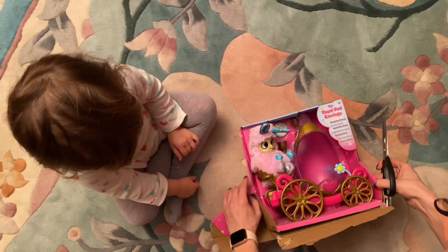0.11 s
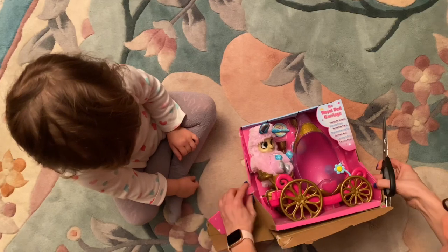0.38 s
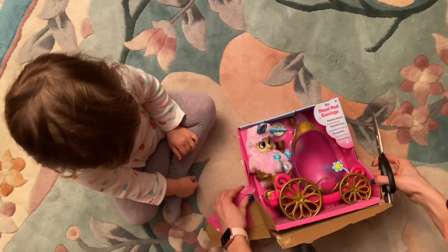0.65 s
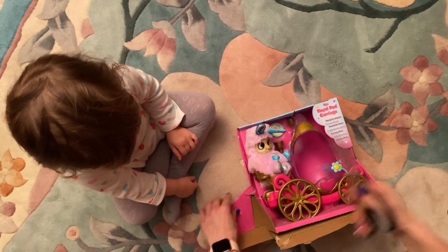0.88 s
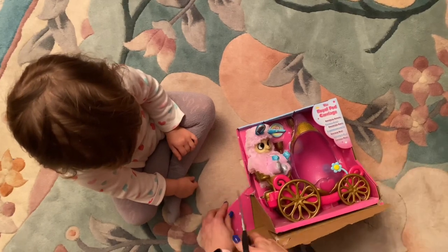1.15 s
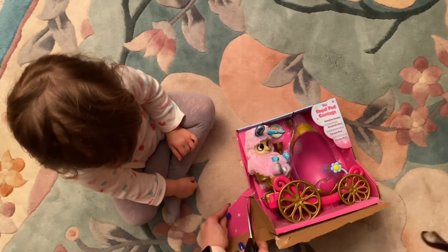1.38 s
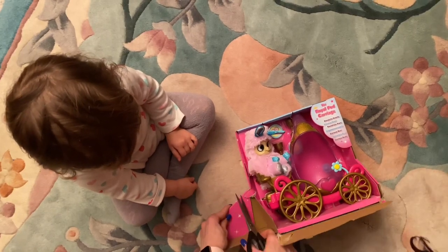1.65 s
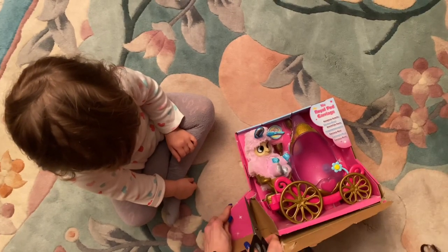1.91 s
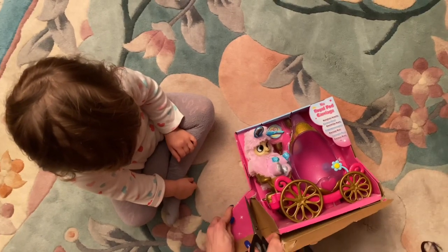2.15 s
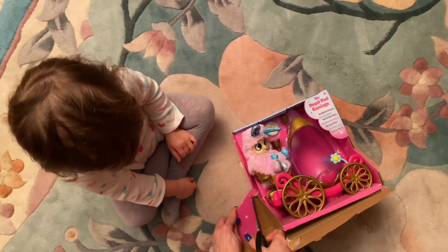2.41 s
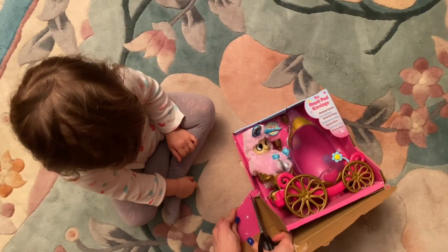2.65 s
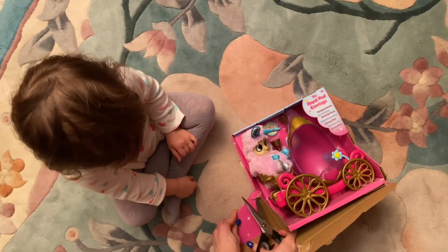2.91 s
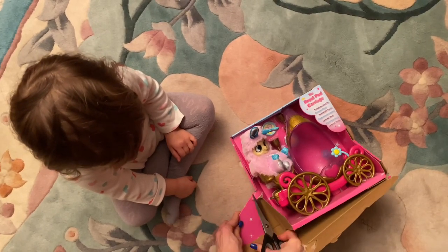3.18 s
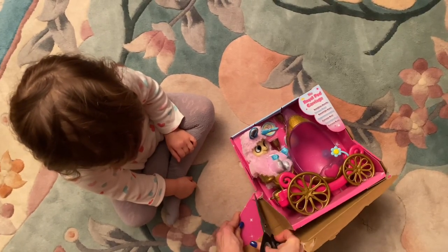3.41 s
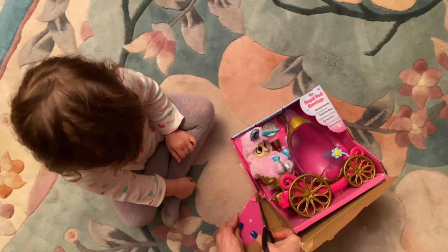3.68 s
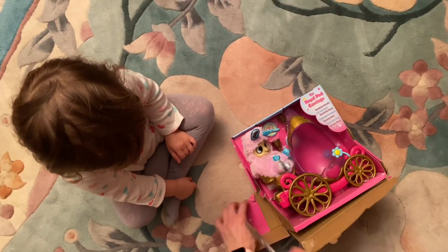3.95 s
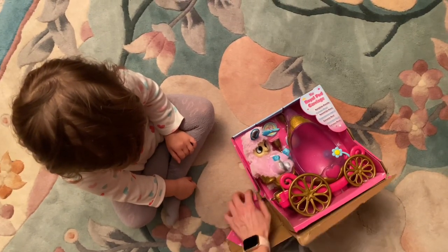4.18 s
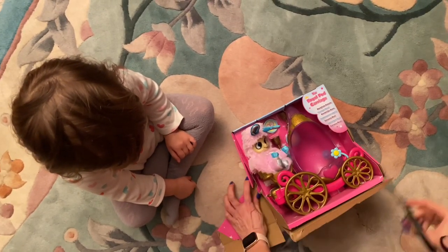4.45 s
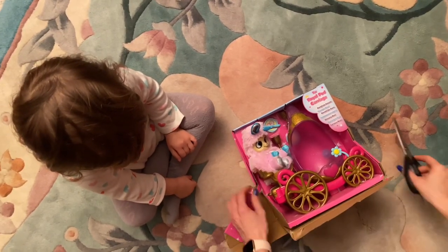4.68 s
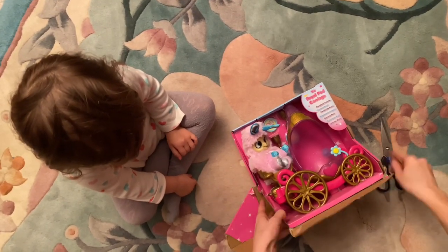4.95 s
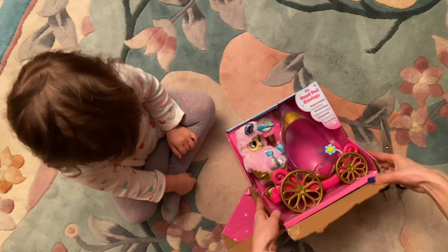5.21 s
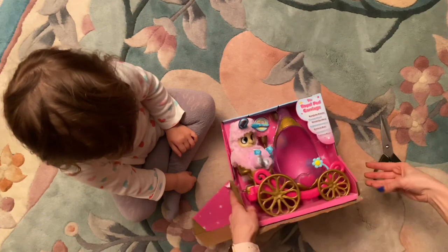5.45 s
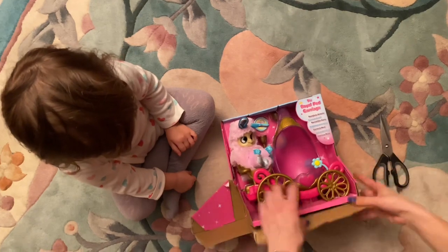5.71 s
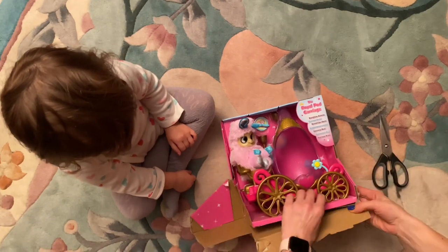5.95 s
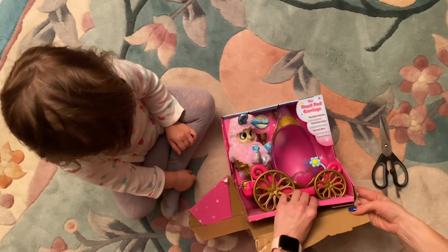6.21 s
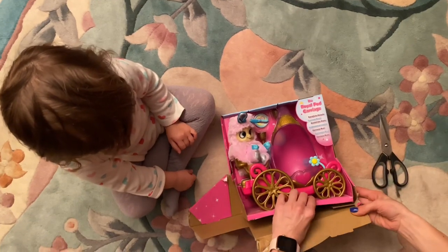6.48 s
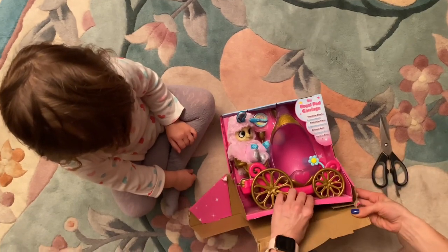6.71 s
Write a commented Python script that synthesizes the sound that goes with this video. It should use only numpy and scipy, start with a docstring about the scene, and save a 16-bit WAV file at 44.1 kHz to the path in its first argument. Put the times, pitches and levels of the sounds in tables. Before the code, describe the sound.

In a quiet, softly furnished room, hands cut and pull open a cardboard toy box with plastic inside, heard close in stereo. It starts mid-rustle, with a strong boxy knock at 0.1 s, then small ticks and film crackles to 0.9 s. After a near-quiet second, light scraping and snips resume around 1.2 s, with a crisp snap at 1.7. A double card snap with a soft thud comes at 2.2, another snap at 2.75, then busy cutting clicks and a bright, loud plastic snap at 3.4. Hollow knocks and bumps cluster from 3.9 to 4.3, the heaviest at 4.13 with a low rug thud. Sparse rustles and ticks follow, with a bump near 5.3 and snaps around 5.7 and 6.0. From 6.2 to 6.5, quick paired fingertip taps ring a hollow plastic shell; sharp film cracks finish at 6.75-6.82. Faint low room hum throughout.

```python
"""Hands cut and pull open a cardboard toy box with a plastic tray, on a rug in a quiet furnished room.
Snips, snaps, knocks and film cracks are bursts of slips that ring the modes of four parts of the package.
Between them card and film rub in dense small slips, and finger taps ring the hollow shell of the toy.
Soft thuds on the rug ring three low modes now and then; diffuse echoes and a low room hum, both decorrelated
noise, surround them. Two close microphone ports above hear the scene in stereo."""
import sys
import numpy as np
from scipy import signal
from scipy.io import wavfile

SR = 44100
rng = np.random.default_rng(int(sys.argv[2]) if len(sys.argv) > 2 else 0)


def attenuation_scalar(level_db):
    """Turn a level in dB into a linear amplitude multiplier (20 dB per decade)."""
    decades = np.asarray(level_db, float) / 20
    return 10 ** decades


def persist_wave(psi):
    """Save psi, clipped to +-1, as 16-bit WAV."""
    counts = np.round(np.clip(psi, -1, 1) * 32767).astype(np.int16)
    wavfile.write(sys.argv[1], SR, np.atleast_2d(counts).T)


N = 302085

# lag of the right port behind the left for hollow box, card, tray, film: (lag [samples])
PORT_LAG = [2, 2, 2, 1]


def package():
    """Modal synthesis: slips excite the modes of four parts; a small box radiates little far below its lowest."""
    # modes of the hollow box: (frequency [Hz], relative level [dB], t60 [s])
    hollow = [(243.4, -9.5, 0.015), (312, -4, 0.032), (388, -4, 0.045), (470, -5, 0.03),
              (519.4, -0.5, 0.033), (592, 1, 0.044), (682, -1, 0.031)]
    # modes of the card panels: (frequency [Hz], relative level [dB], t60 [s])
    panel = [(806, -3, 0.022), (919, -4, 0.023), (1078, -8.5, 0.036), (1210, 2, 0.015), (1430, 4.5, 0.014),
             (1688, 1, 0.013), (1926, -0.5, 0.018), (2220, -0.5, 0.016), (2380, -5, .008)]
    # modes of the plastic tray: (frequency [Hz], relative level [dB], t60 [s])
    tray = [(2530, 4, 0.0035), (3050, -1.5, 0.0085), (3450, -12, 0.024), (3754, -4, 0.011),
            (4155, 1, 0.009), (4770, 4.5, 0.0053), (5166, -3.5, 0.011), (5903, -9.5, 0.018),
            (6552, 1, 0.0076)]
    # modes of the thin film: (frequency [Hz], relative level [dB], t60 [s])
    film = [(7030, -5.5, 0.0096), (7980, -1.5, 0.0026), (10055, -1.5, 0.0013), (10040, -2, 0.0057),
            (10900, -2, 0.011), (11880, 1.5, 0.008), (12200, -2.5, 0.0025), (13330, -4.5, 0.0059),
            (14390, 7, 0.0026), (16000, -1.5, 0.004)]
    # how each part answers: (hit trim [dB], rubbing trim [dB], nominal slip rate [1/s],
    # spread of slip size [dB], share heard alike left and right [0-1], stretch of a hit's slips in time [ratio])
    touches = [(-2.5, -4, 1200, 3.5, 0.94, 2.3935), (-2, -2.5, 2000, 3.5, 0.75, 1.525),
               (1.5, -1.5, 5000, 3.5, 0.45, 1.4), (7, 6, 5700, 3, 0.35, 1.2)]
    base_ms, length_spread = 2.3, 0.15   # slip length before the stretch, and its log-normal spread
    doubling_db = 45   # slips last twice as long for a hit this much heavier on the box
    box_low_hz = 204

    s, hit_db, spot_hz = snaps_and_cracks()
    t, rub_db = pressure(s, hit_db)
    small_s, small_db, small_hz = crackles(t, rub_db)
    s = np.append(s, small_s)
    hit_db = np.hstack([hit_db, small_db])
    spot_hz = np.append(spot_hz, small_hz)

    chance = np.exp(length_spread * rng.standard_normal(len(s)))
    length_ms = base_ms * 2 ** ((hit_db[0] + 55) / doubling_db) * chance
    clumps = attenuation_scalar(4.5 * drift(55))
    out = taps()
    for k, (modes, touch) in enumerate(zip([hollow, panel, tray, film], touches)):
        hit_trim_db, rub_trim_db, per_s, spread_db, alike, drag = touch
        struck = hits(s, length_ms, spot_hz, modes, hit_db[k] + hit_trim_db, drag, PORT_LAG[k])
        rub_level = attenuation_scalar(rub_trim_db + np.interp(np.arange(N) / SR, t, rub_db[k]))
        rubbed = rub_level * rubbing(modes, per_s, spread_db, alike, PORT_LAG[k], clumps)
        out = out + soft(struck + rubbed, modes)
    return signal.sosfilt(signal.butter(4, box_low_hz, "high", fs=SR, output="sos"), out)


def snaps_and_cracks():
    """Localized excitation: times, part levels and touched spots of snips, snaps, knocks and film cracks."""
    # snips, snaps and knocks: (time [s], hollow box level [dB], card panel level [dB], plastic level [dB],
    # frequency near which the touched spot of card rings best [Hz]); levels before the trims of the parts
    strikes = [(0.0406, -46, -44, -51, 290), (0.0561, -58, -46, -47, 1430), (0.1086, -22, -22, -28.5, 1310),
               (0.1257, -32, -27, -39.5, 660), (0.2706, -36.5, -42, -59.5, 840),
               (0.3947, -51.5, -44, -37, 1420), (0.4264, -44, -45.5, -38.5, 1230),
               (0.6307, -75, -46, -50, 790), (0.6585, -58.5, -47, -40.5, 1430),
               (0.7643, -77.5, -63, -60.5, 950), (1.3225, -75.5, -43.5, -45, 2530),
               (1.4581, -46.5, -34, -42, 1590), (1.4822, -49.5, -48.5, -54, 1350),
               (1.521, -52, -49, -48.5, 1090), (1.7118, -58.5, -25.5, -28, 1030),
               (1.803, -50, -56, -53, 2250), (1.8142, -51, -40, -48, 2030), (1.8504, -75, -54, -51.5, 1430),
               (2.021, -62.5, -50.5, -48, 1360), (2.0505, -75, -59.5, -54, 2100),
               (2.0739, -51, -41, -44.5, 1250), (2.0983, -51, -39.5, -49.5, 1270),
               (2.1606, -53, -52, -58, 513.6), (2.2035, -27, -25, -33, 1430),
               (2.209, -29, -25.5, -32.5, 1610), (2.4896, -83.5, -34, -43.5, 1280),
               (2.5876, -85, -47.5, -51.5, 1400), (2.7717, -33, -22.5, -30.5, 760),
               (2.941, -78.5, -51.5, -45.5, 1140), (2.9636, -58.5, -49, -40, 1240),
               (2.9714, -52.5, -39, -42, 1430), (3.0134, -44.5, -31.5, -35.5, 1210),
               (3.04, -57.5, -43, -51, 1145), (3.1462, -84, -54, -55, 1390),
               (3.2518, -70.5, -38.5, -46, 1250), (3.3132, -50, -44, -50, 1300),
               (3.3767, -41.5, -41, -39, 1360), (3.3934, -57, -33.5, -33, 1360),
               (3.4135, -26, -29, -11, 1430), (3.4364, -45, -58.5, -39, 661.9),
               (3.5711, -43, -45.5, -39.5, 2250), (3.6193, -52, -45.5, -52, 1310),
               (3.677, -46.5, -42, -69, 1320), (3.7181, -44.5, -43.5, -41.5, 1366),
               (3.7255, -44, -36.5, -39.5, 1470), (3.9049, -29, -22.5, -32, 843),
               (3.9203, -29.5, -32, -53, 640), (3.9745, -39.5, -33.5, -43, 827.2),
               (3.981, -36, -36, -46, 880), (4.0524, -30.5, -26, -41, 1080),
               (4.1111, -36.5, -31.5, -50.5, 400), (4.1323, -19, -25, -26.5, 534),
               (4.2107, -34, -37, -40, 1690), (4.2849, -49, -42.5, -40.5, 585),
               (4.4576, -44.5, -41.5, -54, 684), (4.5451, -53.5, -42.5, -43, 1430),
               (4.5757, -42.5, -45, -54, 1270), (4.6527, -86.5, -56, -65, 1430),
               (4.7957, -59, -45, -43.5, 2088), (4.8878, -74, -50.5, -49.5, 1742),
               (4.9169, -47.5, -47, -55, 870), (5.0942, -64.5, -55, -47, 1454),
               (5.1789, -63, -47, -46.5, 1350), (5.2926, -37, -32.5, -34.5, 910),
               (5.4943, -76, -58, -59, 1900), (5.6633, -43, -36.5, -39.5, 1700),
               (5.815, -52.5, -46, -63, 1210), (5.8688, -66.5, -45, -50, 876),
               (5.883, -58.5, -42.5, -51.5, 1110), (5.9717, -66, -43.5, -36, 2200),
               (5.9827, -75.5, -39.5, -37.5, 560), (6.0067, -64, -46.5, -44.5, 1710),
               (6.082, -58.5, -49.5, -48, 2590), (6.1267, -65, -56, -49.5, 1710),
               (6.6502, -68, -49.5, -53, 2090), (6.6999, -50.5, -42.5, -56, 2220),
               (6.7099, -43, -49, -45.5, 1265)]
    # cracks of the thin film: (time [s], film level [dB], tray against film [dB]); levels before the trims
    film_cracks = [(0.368, -44.5, -20.5), (0.382, -43, -16), (.472, -44, -11.5), (0.4787, -51, -1),
                   (0.4877, -45.5, -16), (.874, -55, -5), (0.9036, -51, -11.5), (1.144, -51, -8),
                   (2.391, -54, -20), (2.431, -65, 16), (2.754, -52, -16), (2.7606, -25, -12),
                   (2.89, -54, -13.5), (3.7973, -51, 2), (4.9845, -53.5, 4), (5.009, -37, -9.5),
                   (5.0763, -47, -9), (5.1106, -57, 13.5), (5.4778, -57, 1), (5.5758, -50.5, -3),
                   (5.644, -59, 10.5), (5.7108, -47.5, -1.5), (5.966, -46, -5.5), (5.978, -36.5, -0.5),
                   (6.1725, -41, -6.5), (6.413, -53.5, -4), (6.624, -57.5, -0.5), (6.6412, -54, -2.5),
                   (6.7565, -24, -12.5), (6.7977, -38, -17), (6.8056, -26.5, -22), (6.8233, -34, -17)]
    box_db, card_db, crack_spot_hz = -20, -12.5, 1900   # box and card against the tray in a film crack

    hit_s, *levels, spot_hz = np.transpose(strikes)
    crack_s, film_db, tray_over_film_db = np.transpose(film_cracks)
    tray_db = film_db + tray_over_film_db
    crack_db = [tray_db + box_db, tray_db + card_db, tray_db, film_db]
    s = np.append(hit_s, crack_s)
    hit_db = np.hstack([with_film(*levels), crack_db])
    return s, hit_db, np.append(spot_hz, np.full_like(crack_s, crack_spot_hz))


def with_film(box_db, card_db, plastic_db):
    """Coupled levels: the film follows the tray and gains as plastic outweighs card."""
    film_db = plastic_db - 3.5 + 0.35 * (plastic_db - card_db)
    return np.array([box_db, card_db, plastic_db, film_db])


def hits(s, length_ms, spot_hz, modes, level_db, drag, lag, colour_db=2.5, spot_db=9.0, count=8):
    """Impulse excitation: each hit is a few quick slips that swell and fade; every mode feels them its own way."""
    out = np.zeros((2, N))
    for hz, mode_db, t60 in modes:
        when, sign = rng.random((2, len(s), count))
        colour, pan, turn = rng.standard_normal((3, len(s), 1))
        # modes near the touched spot are favoured
        favour_db = spot_db * np.exp(-(np.log2(hz / spot_hz) / 0.27) ** 2)
        # the box reaches each port a little out of step
        late = lag + np.round(0.066 * turn * SR / hz).astype(int)
        # low modes answer about a cycle late
        start = s[:, None] + 0.9 / hz
        at = np.round((start + drag * (when - 0.15) * length_ms[:, None] / 1000) * SR).astype(int)

        envelope = when / 0.31 * np.exp(1 - when / 0.29)
        height = attenuation_scalar((level_db + mode_db + favour_db)[:, None] + colour_db * colour)
        size = height * envelope * np.sign(sign - 0.5)
        # limit how far slips cancel or pile up: joint response against the sum of powers
        joint = np.abs(np.sum(size * np.exp(2j * np.pi * hz * at / SR), axis=1, keepdims=True))
        size = size * np.clip(np.linalg.norm(size, axis=1, keepdims=True) / (joint + 1e-12), 0.5, 2)

        lean = attenuation_scalar(pan)   # chance left-right balance of spread 1 dB each way
        clicks = np.zeros((2, N + 999))   # room for slips past the end
        np.add.at(clicks[0], at, size * lean)
        np.add.at(clicks[1], at + late, size / lean)
        out += ring(clicks[:, :N], hz, t60)
    return out / np.sqrt(len(modes) * count / 2)


def ring(clicks, hz, t60):
    """Two-pole resonator: a unit click sets a decaying sine of initial height 1 ringing."""
    r = attenuation_scalar(-60 / (t60 * SR))
    w = 2 * np.pi * hz / SR
    return signal.lfilter([0, np.sin(w)], [1, -2 * r * np.cos(w), r * r], clicks + 1e-18)


def pressure(hit_s, hit_db):
    """Power addition: rubbing level [dB] of each part every millisecond, from strokes, slides and settling."""
    # strokes of fingers and blades: (peak time [s], card level [dB], time to swell by 20 dB [s],
    # time to fade by 20 dB [s], plastic against card [dB]); times under 1 ms act as 1 ms
    strokes = [(0.0, -42, .05, 0.0333, -12.5), (.17, -57.5, 8, 0.08, -11), (.27, -63.5, -1.5, 0.13, -6),
               (.41, -53.5, 0.07, .07, 1.5), (.475, -62.5, 0.23, 0.06, -1.5),
               (0.662, -54.5, 0.12, 0.0788, -2.5), (.88, -90, 0.3, 0.5, 4.5), (1.08, -69, 0.06, 0.39, -3.5),
               (1.219, -57.5, 0.0622, 0.0475, 2.5), (1.35, -63, 0.2, 0.3, -20.5),
               (1.501, -58.5, 0.11, 0.05, -3), (1.652, -63, 0.28, -0.05, -9.5), (1.75, -60, 0.09, 0.08, -5),
               (1.811, -54, 0.12, 0.07, -10), (1.94, -70, 0.6, .06, -12), (2.029, -67, 0.0421, 0.9, -7),
               (2.12, -62.5, 0.18, 0.8, -6), (2.248, -57.5, .15, 0.15, -11), (2.5, -51.5, -0.0243, 0, -8.5),
               (2.621, -65, 0.1, 1.2, -20), (2.69, -56.5, -0.07, 0.27, -14), (2.73, -43, .07, 0.02, -7),
               (2.778, -51.5, 0.0137, 0.11, -3), (2.88, -68, -0.1, 1.1, -5), (2.975, -48, .06, .05, -3),
               (3.019, -50.5, 0.04, -0.06, -6), (3.181, -56.5, 0.18, 0.04, -2.5),
               (3.23, -62.5, .1, 0.1, -14.5), (3.33, -58, .05, -0.1, -8), (3.4, -39.5, 0.007, 0.04, -8),
               (3.448, -61.5, 0.02, 0.11, 9), (3.579, -57.5, -0.25, 0.74, -3.5),
               (3.719, -52, -0.2, 0.25, -6.5), (3.888, -50.5, 0.05, 0.2117, -4),
               (3.98, -61, 0.2, 0.13, -12), (4.169, -46.5, 0.03, .13, -3.5),
               (4.298, -51.5, -0.04, 0.13, -2), (4.47, -65, -0.9, 0.1772, -3),
               (4.54, -46.5, 0.0133, 0.02, -12.5), (4.809, -55.5, .02, 0.08, -7),
               (4.92, -64, 0.11, 0.26, -4), (5.01, -68, .15, 0.375, -0.5),
               (5.109, -61.5, -0.02, 0.22, -3.5), (5.2, -58.5, 0.04, .17, 0), (5.299, -57, 0.04, .1, -4.5),
               (5.43, -67.5, 0.16, 0.13, 3), (5.61, -69, .05, 0.8, -1.5), (5.68, -59, 0.02, 0.33, -3.5),
               (5.789, -56.5, 0.18, 0.08, -11), (5.978, -53, 0.0738, 0.09, 0.5), (6.1, -67, 0.13, 0.4, -3),
               (6.208, -55, -0.03, 0.05, -4), (6.338, -65, 0.08, 0.44, 0), (6.489, -61.5, -0.3, 0.17, -1),
               (6.66, -66, -0.5, 0, 1), (6.729, -50.5, -0.0049, 0.17, -13), (6.81, -66, 0.17, 1.12, 8.5)]
    # the box slides on the rug and its hollow rumbles: (peak time [s], level [dB], time to fade by 20 dB [s])
    slides = [(0.0, -43, 0.12), (.15, -54.5, 0.34), (0.419, -54, .06), (1.53, -59, -0.13), (2.1, -62, 0.45),
              (2.24, -52, 0.1), (2.73, -47, 0.0917), (3.4, -47.5, 0.2), (3.98, -58.5, 0.22),
              (4.17, -49, 0.29), (4.29, -55.5, 0.2), (5.16, -61, -0.2), (5.305, -49, 0.11),
              (5.68, -55, 0.08), (5.98, -53.5, 0.05), (6.37, -62, 0), (6.74, -53, .09)]
    slide_rise_s = 0.04
    box_rub_db, box_rub_lean = -12.5, -0.27   # hollow box against card; it loses as plastic gains
    settle_db = np.array([-26, -36.5, -30.5, -38])   # rustle of each part against its hit
    settle_rise_s, settle_fade_s = 0.0063, 0.088   # rise constant, and time to fade by 20 dB

    t = np.arange(N * 1000 // SR + 2) / 1000
    s, card_db, rise, fall, plastic_db = np.transpose(strokes)
    box_db = card_db + box_rub_db + box_rub_lean * plastic_db
    stroke_db = with_film(box_db, card_db, card_db + plastic_db)
    power = attenuation_scalar(2 * stroke_db) @ swell(t, s, rise[:, None], fall[:, None])

    # after a hit each part rustles as it settles
    since = np.maximum(t - hit_s[:, None], 0)
    settle = attenuation_scalar(-40 * since / settle_fade_s) * (1 - np.exp(-since / settle_rise_s)) ** 2
    power += attenuation_scalar(2 * (hit_db + settle_db[:, None])) @ settle

    s, slide_db, fall = np.transpose(slides)
    power[0] += attenuation_scalar(2 * slide_db) @ swell(t, s, slide_rise_s, fall[:, None])
    return t, 10 * np.log10(power + 1e-13)


def swell(t, s, rise, fall):
    """Power envelope: strokes swell to a peak at s and fade, by 20 dB in the times rise and fall."""
    roundness = 1.23   # 1 = pointed peak, 2 = dome
    since = t - s[:, None]
    span = np.maximum(np.where(since < 0, rise, fall), 1e-3)
    return attenuation_scalar(-40 * np.abs(since / span) ** roundness)


def rubbing(modes, per_s, spread_db, alike, lag, clumps, wander_db=4.5):
    """Stick-slip friction: random slips in clumps are dealt to the modes; the colour wanders with the grip."""
    grip = SR // 16   # samples that one grip lasts
    size = attenuation_scalar(spread_db * np.minimum(rng.exponential(1, (3, N)), 4))
    draw = rng.uniform(-1, 1, (3, N))
    slips = size * np.sign(draw) * (np.abs(draw) < per_s * clumps / SR)
    # one shared stream and one for each port
    shared = np.array([slips[0], np.roll(slips[0], lag)])
    slips = np.sqrt(alike) * shared + np.sqrt(1 - alike) * slips[1:]

    # runs of 16 samples go to one mode each
    dealt = np.repeat(rng.integers(0, len(modes), N // 16 + 1), 16)[:N]
    # a new strength per mode and grip
    grips = rng.standard_normal((len(modes), N // grip + 1))
    slips = slips * attenuation_scalar(wander_db * grips)[dealt, np.arange(N) // grip]
    out = np.zeros((2, N))
    for k, (hz, mode_db, t60) in enumerate(modes):
        out += attenuation_scalar(mode_db) * ring(slips * (dealt == k), hz, t60)
    return rms_one(out)


def drift(rate):
    """Low-rate random modulation: straight lines between chance knots, rate of them per second, unit rms."""
    knots = rng.standard_normal(int(N / SR * 60) + 2)
    return rms_one(np.interp(np.arange(N) / SR * rate, np.arange(len(knots)), knots))


def rms_one(x):
    """Normalization of power: scale to unit rms."""
    return x / np.sqrt(np.mean(x ** 2) + 1e-30)


def crackles(t, rub_db, count=70):
    """Random impulsive events: small chance snaps whose level follows the rubbing of the moment."""
    offset_db, spread_db, colour_db = 3, 3.5, 4   # over the rubbing level
    when, size, spot = rng.random((count, 3)).T
    s = when * (N / SR - 0.02)
    colour = rng.standard_normal((count, 4)).T
    over_db = offset_db - spread_db * np.log(1 - 0.98 * size) + colour_db * colour
    level_db = np.array([np.interp(s, t, db) for db in rub_db]) + over_db
    return s, level_db, 600 * 4.0 ** spot


def soft(x, modes):
    """Low-pass contact: fingers and card are soft, so little sounds far above the top mode of a part."""
    cutoff_hz = min(2.0 * modes[-1][0], 0.45 * SR)
    return signal.sosfilt(signal.butter(2, cutoff_hz, fs=SR, output="sos"), x)


def taps():
    """Shell resonance: finger taps ring the hollow shell of the toy, much alike each time."""
    # finger taps on the toy: (time [s], level before the mode levels [dB])
    touches = [(6.198, -40.5), (6.236, -51.5), (6.324, -38), (6.366, -39.5), (6.462, -40), (6.505, -39)]
    # modes of the shell: (frequency [Hz], relative level [dB], t60 [s])
    shell = [(522.4, -12.5, 0.14), (586, -10.5, 0.064), (716, -7, 0.044), (1803, -3.5, 0.015),
             (2120, -10.5, 0.03), (3550, -5.5, 0.00734)]
    s, db = np.transpose(touches)
    out = np.zeros(N)
    for hz, mode_db, t60 in shell:
        late = rng.random(len(s)) / hz   # each mode catches up within a cycle
        at = np.round((s + late) * SR).astype(int)
        clicks = np.zeros(N)
        clicks[at] = attenuation_scalar(db + mode_db + 2.34 * rng.standard_normal(len(s)))
        out += ring(clicks, hz, t60)
    return np.array([out, np.roll(out, PORT_LAG[0])])


def thuds(swell_s=0.0051):
    """Soft-impact resonance: a push rings low modes, each less a quickly dying twin, so that it swells."""
    # box pushed against the rug: (time [s], floor level [dB], rug hollow level [dB], box bottom level [dB]);
    # levels before the strengths of push and rebound
    pushes = [(0.109, -65, -66, -62), (2.216, -62, -56, -79), (2.492, -88, -76, -78),
              (2.769, -68.5, -74, -57), (3.027, -68.5, -73.5, -79.5), (3.42, -64, -58.5, -51),
              (3.907, -72, -74, -74), (4.139, -46.5, -52.5, -48.5), (4.21, -83, -68.5, -55),
              (5.095, -66.5, -74, -72.5), (5.288, -68, -53, -50), (5.663, -77, -61.5, -65.5),
              (5.781, -68, -65, -69.5), (6.699, -77, -77, -80)]
    # modes of floor, rug hollow and box bottom: (frequency [Hz], t60 [s])
    low_modes = [(72, 0.18), (128, 0.18), (203, 0.25)]
    twin_ratio, twin_db = 1.17, -5.5   # each mode has a close upper neighbour

    s, *levels = np.transpose(pushes)
    out = np.zeros(N)
    for (hz, t60), db in zip(low_modes, levels):
        rebound_s = s + rng.uniform(0.015, 0.045, len(s))
        clicks = np.zeros(N)
        clicks[np.round(s * SR).astype(int)] = attenuation_scalar(db + 6)
        clicks[np.round(rebound_s * SR).astype(int)] = attenuation_scalar(db - 5.5)
        for pitch_hz, gain in [(hz, 1), (hz * twin_ratio, attenuation_scalar(twin_db))]:
            quick = ring(clicks, pitch_hz, swell_s * np.log(1000))   # time constant to t60
            out += gain * (ring(clicks, pitch_hz, t60) - quick)
    return out


def room(x):
    """Diffuse reverberation: echoes as noise that starts after the first wall and dies band by band."""
    # reverberation time: (frequency [Hz], t60 [s])
    decay = [(100, 0.48), (400, 0.18), (1500, 0.14), (5000, 0.18), (14000, 0.1)]
    level_db, gap_s = -7.5, 0.0014
    t = np.arange(SR // 2) / SR
    tail = np.zeros((2, len(t)))
    for hz, (mid, side) in bands(rng.standard_normal((2, 2, len(t)))):
        tail += pair(hz, mid, side) * attenuation_scalar(-60 * t / at_hz(decay, hz))
    tail = tail * (1 - np.exp(-(t / gap_s) ** 2))
    tail = tail / np.sqrt(np.sum(tail ** 2, axis=1, keepdims=True))
    mono = x.mean(axis=0, keepdims=True)
    return attenuation_scalar(level_db) * signal.fftconvolve(mono, tail, axes=1)[:, :N]


def hum():
    """Stationary coloured noise: the steady low hum of the room, shaped band by band."""
    # spectrum of the hum: (frequency [Hz], relative density [dB per Hz])
    spectrum = [(18, -32), (30, -0.5), (81, -7), (100, -1), (124, 0), (962, -38), (1430, -26),
                (3310, -28.5), (11400, -38), (12600, -57), (16000, -41)]
    out = np.zeros((2, N))
    for hz, (mid, side) in bands(rng.standard_normal((2, 2, N))):
        out += attenuation_scalar(at_hz(spectrum, hz)) * pair(hz, mid, side)
    return attenuation_scalar(-75) * rms_one(out)


def bands(white):
    """Filter-bank analysis: split noise into half-octave bands, neighbours unrelated."""
    edges = 30 * 2 ** np.arange(0, 9.6, 0.5)   # Hz
    for k, (low, high) in enumerate(zip(edges, edges[1:])):
        sos = signal.butter(2, [low, high], "band", fs=SR, output="sos")
        yield np.sqrt(low * high), signal.sosfilt(sos, white[k % 2])


def pair(hz, mid, side):
    """Interchannel coherence: left and right of a diffuse band as sum and difference of unrelated noises."""
    # likeness of the two ports in diffuse sound: (frequency [Hz], left-right correlation [0-1])
    likeness = [(60, 1), (300, 0.41), (700, 0.11), (3000, 0.4), (8000, 0.026)]
    alike = at_hz(likeness, hz)
    return np.sqrt(1 + alike) * mid + np.sqrt(1 - alike) * side * [[1], [-1]]


def at_hz(points, hz):
    """Logarithmic pitch scale: read a table on a log-frequency axis."""
    table_hz, value = np.transpose(points)
    return np.interp(np.log(hz), np.log(table_hz), value)


def scene():
    """Superposition: package and thuds, their echoes in the room, and the hum."""
    near = package() + thuds()
    return near + room(near) + hum()


def roll_off(x):
    """The treble ends steeply here."""
    return signal.sosfilt(signal.butter(12, 16660, fs=SR, output="sos"), x)


def record(dry):
    """Linear filtering: a high-pass, a low-pass near 16.6 kHz and a broad dip near 13 kHz shape the sound."""
    low_hz, top_hz = 40.7, 16600
    dip_hz, dip_width_hz, dip_share = 13110, 3830, 0.87
    shaped = signal.sosfilt(signal.butter(2, low_hz, "high", fs=SR, output="sos"), dry)
    shaped = signal.sosfilt(signal.cheby2(8, 40, top_hz, fs=SR, output="sos"), shaped)
    dip_band = signal.lfilter(*signal.iirpeak(dip_hz, dip_hz / dip_width_hz, fs=SR), shaped)
    mix = shaped - dip_share * dip_band
    return roll_off(mix)


dry = scene()
out = record(dry)
persist_wave(out)
```